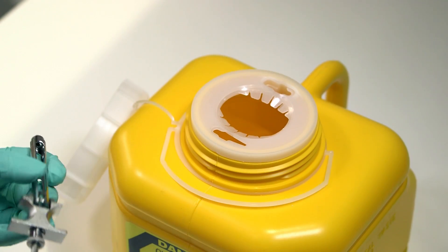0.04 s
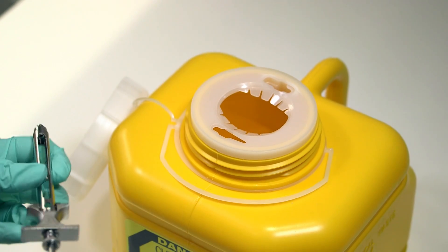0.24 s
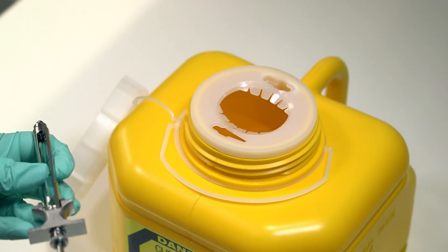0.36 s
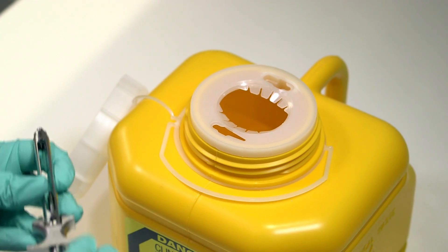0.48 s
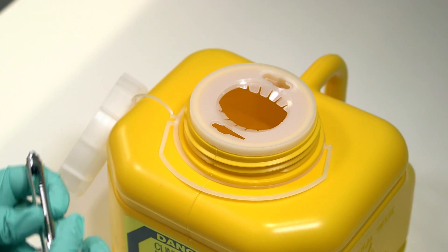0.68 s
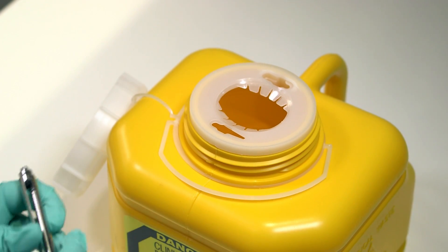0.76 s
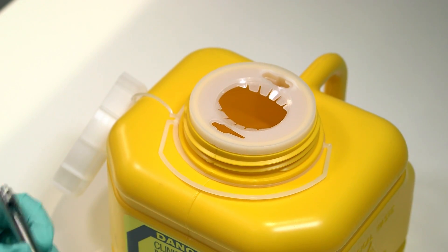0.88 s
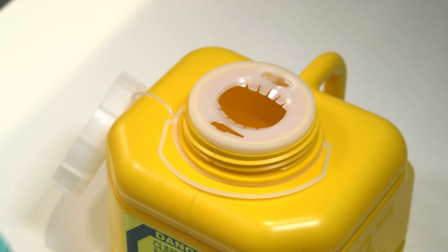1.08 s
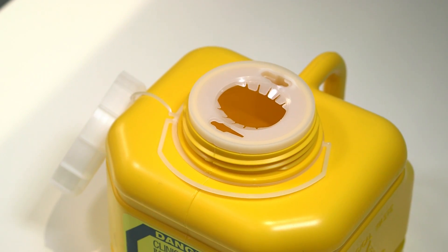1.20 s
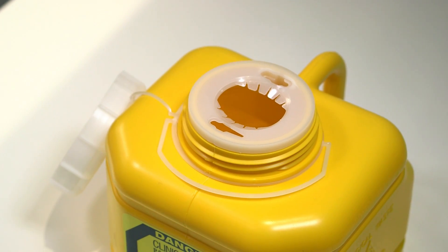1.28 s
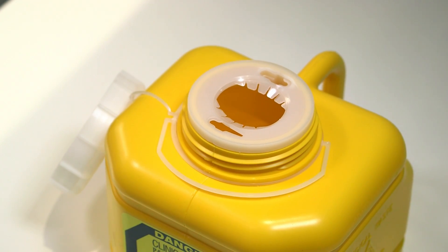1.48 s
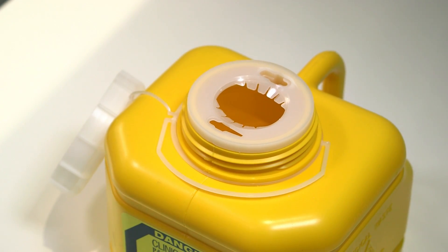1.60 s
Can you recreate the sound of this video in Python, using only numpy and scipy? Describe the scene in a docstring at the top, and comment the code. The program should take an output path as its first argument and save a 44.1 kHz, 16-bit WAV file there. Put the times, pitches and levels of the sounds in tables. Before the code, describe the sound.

A steel syringe is handled close up in a small, fairly dry room. Plastic shuffles softly with dull knocks from 0 s, peaking in hard hollow knocks near 0.35 s. From 0.5 s steel slides and rasps; sharp clicks land near 0.68 and 0.84 s, then bright clinks on glass around 1.0 to 1.2 s, with low thumps. Glove rustle and faint rumble fade by 1.6 s.

```python
"""A small room: a steel dental syringe is handled close by, beside a hollow plastic container.
First the plastic is shuffled and knocked; then steel parts slide, catch and clink on the glass cartridge.
Steel is noise chatter and slips through resonators, free rings and gliding rasps; plastic is struck modes,
wall noise and cracks. Jolts add low thumps. Rustle and rumble lie beneath, and the sound dies away
as the hands withdraw."""
import sys
import numpy as np
from scipy import signal
from scipy.fft import rfft, irfft
from scipy.io import wavfile
from scipy.ndimage import map_coordinates

SR = 44100
rng = np.random.default_rng(int(sys.argv[2]) if len(sys.argv) > 2 else 0)


def bounce(signal):
    """Save signal as a 16-bit WAV file at the path given by the first command-line argument."""
    frames = np.transpose(np.atleast_2d(signal))
    limited = np.clip(frames, -1, 1)
    pcm = np.round(limited * 32767).astype(np.int16)
    wavfile.write(sys.argv[1], SR, pcm)


N = 72765
TIME_S = np.arange(N) / SR


def from_db(db):
    """Decibels to amplitude gain."""
    return 10 ** (np.asarray(db) / 20)


def rms_one(x):
    """Scale to unit rms."""
    return x / np.sqrt(np.mean(x ** 2) + 1e-20)


def level(curve):
    """Gain over time from (time_s, level_db) points."""
    return from_db(np.interp(TIME_S, *np.transpose(curve)))


def filtered(x, cutoff_hz, kind, order=2):
    """Butterworth filter."""
    sos = signal.butter(order, min(cutoff_hz, SR / 2 - 100), kind, fs=SR, output="sos")
    return signal.sosfilt(sos, x + 1e-18)


def noise(colour):
    """Unit-rms noise shaped by (freq_hz, density_db) points, interpolated over log frequency."""
    freq_hz, density_db = np.transpose(colour)
    bins_hz = np.fft.rfftfreq(N, 1 / SR)
    gain = from_db(np.interp(np.log(bins_hz + 1), np.log(freq_hz), density_db))
    return rms_one(irfft(rfft(rng.standard_normal(N)) * gain, N))


def wander(cutoff_hz):
    """Low-passed random drift of unit rms, clipped at two."""
    drift = rms_one(filtered(rng.standard_normal(N), cutoff_hz, "low"))
    return np.clip(drift, -2, 2)


def dying(start_s, t60_s):
    """Envelope that jumps to one and decays exponentially, 60 dB per t60."""
    age_s = np.maximum(TIME_S - start_s, 0)
    return (TIME_S >= start_s) * np.exp(-np.log(1000) * age_s / t60_s)


def ring(start_s, pitch_hz, t60_s):
    """One struck mode: a decaying sine."""
    return dying(start_s, t60_s) * np.sin(2 * np.pi * pitch_hz * (TIME_S - start_s))


# Syringe resonances, damped by the fingers: pitch_hz, width_hz, level_db
SYRINGE_MODES = [(3485, 370, -2.5), (4240, 250, -9), (6724, 350, -0.5), (9040, 500, -17.5),
                 (10350, 480, -11.5), (11410, 230, 4), (12080, 200, 8), (12860, 370, 4.5), (14000, 480, -2)]
LOWER_PART_HZ = 8000
CONTACT_DB = -13.5
GRIP_CHANGES_HZ = 22


def syringe_body(lower_force, upper_force, grip_db):
    """Contact forces drive damped resonators; the shifting grip varies each; some force is heard directly."""
    out = from_db(CONTACT_DB) * filtered(upper_force, 4300, "high")
    for pitch_hz, width_hz, level_db in SYRINGE_MODES:
        radius = np.exp(-np.pi * width_hz / SR)
        grip = wander(GRIP_CHANGES_HZ)
        force = lower_force if pitch_hz < LOWER_PART_HZ else upper_force
        force = force * from_db(level_db + grip_db * grip)
        poles = [1, -2 * radius * np.cos(2 * np.pi * pitch_hz / SR), radius * radius]
        out += (1 - radius * radius) / 2 * signal.lfilter([1, 0, -1], poles, force + 1e-18)
    return out


# Steel catches on steel and glass: start_s, level_db, contact_s, lower_modes_db, ring_db
# (lower_modes_db and ring_db relative to level_db)
CATCHES = [(0.224, -39.5, 0.0025, 17.5, -23.5), (0.5536, -27, 0.0071, -28.5, -10),
           (0.605, -29.5, 0.0045, -10, -24.5), (0.6637, -33.5, 0.0057, -1, -38),
           (0.673, -23.5, 0.0031, 4, -33.5), (0.6814, -13.5, 0.0015, -4, -29),
           (0.6847, -18, 0.0026, -2, -31), (0.727, -30.5, 0.0053, -0.5, -26),
           (0.7357, -30, 0.0077, -10.5, -25), (0.778, -26.5, 0.0066, -12, -23),
           (0.787, -39.5, 0.0013, 14.5, -20.5), (0.8384, -15.5, 0.0014, 8, -15),
           (0.8408, -9.5, 0.0014, -15, -18), (0.961, -33, 0.0014, 13, -19), (0.972, -19, 0.0043, 0, -13.5),
           (0.998, -20.5, 0.0054, -12, -40), (1.0596, -27, 0.0017, -18, -19.5),
           (1.064, -15, 0.0025, -13, -4), (1.0669, -27, 0.00084, -25, 1), (1.1156, -26, 0.004, 1.5, -6),
           (1.121, -25.5, 0.0055, -5, -8), (1.145, -28, 0.0032, 3.5, -11), (1.2253, -26, 0.0027, 1.5, -9),
           (1.4156, -40, 0.0033, 0.5, -2.5)]
# Free ring of the barrel: pitch_hz, level_db, t60_s
BARREL_MODES = [(4250, -31.5, 0.36), (6580, -14, 0.12), (9240, -20, 0.12), (9715, -9.5, 0.07),
                (11340, -24.5, .15), (12310, -5.5, .11), (13000, -14.5, 0.14), (15160, -14, .11)]
# Light taps on the glass cartridge and small parts: start_s, pitch_hz, level_db, t60_s
TAPS = [(0.2269, 9100, -34, 0.013), (0.9998, 9140, -24, 0.068), (1.059, 14600, -19.5, 0.03),
        (1.0698, 12500, -9.5, 0.022), (1.1175, 14000, -22.5, 0.035), (1.118, 3420, -35.5, 0.046),
        (1.415, 6650, -41, 0.038), (1.418, 4230, -54, 0.053), (1.512, 4240, -59.5, 0.063)]
CATCH_BODY_DB = 2


def clinks():
    """Each catch is brief random-sign chatter into the body plus a free barrel ring; taps are single modes."""
    lower_force, upper_force, rings = np.zeros((3, N))
    for start_s, level_db, contact_s, lower_modes_db, ring_db in CATCHES:
        contact = (TIME_S >= start_s) * np.exp(-((TIME_S - start_s) / contact_s) ** 2)
        chatter = from_db(level_db) * rng.choice([-1, 1], N) * contact
        lower_force += from_db(lower_modes_db) * chatter
        upper_force += chatter
        for pitch_hz, mode_db, t60_s in BARREL_MODES:
            part_db = lower_modes_db * (pitch_hz < LOWER_PART_HZ)
            rings += from_db(level_db + ring_db + mode_db + part_db) * ring(start_s, pitch_hz, t60_s)
    taps = sum(from_db(level_db) * ring(start_s, pitch_hz, t60_s)
               for start_s, pitch_hz, level_db, t60_s in TAPS)
    return from_db(CATCH_BODY_DB) * syringe_body(lower_force, upper_force, grip_db=0.0) + rings + taps


# Plunger slide level: time_s, level_db
SLIDE_LEVEL = [(0.0, -61), (0.44, -78), (0.49, -45.5), (0.545, -46), (0.64, -47), (0.71, -44),
               (0.755, -52.5), (0.78, -37.5), (0.80, -44), (0.87, -40.5), (0.935, -56.5), (1.65, -75)]
SLIPS_PER_S, SLIP_SPREAD_DB, SLIDE_LOWER_DB, GRIP_DB = 880, 3, -1.5, 4.5
PITCH_DRIFT_SHARE, PITCH_DRIFT_HZ = 0.029, 10


def plunger():
    """Sliding steel: dense uneven slips drive the body; varying playback speed drifts its resonances."""
    excess = np.minimum(rng.exponential(1, N), 4)
    sizes = from_db(SLIP_SPREAD_DB * excess) * rng.choice([-1, 1], N)
    slips = sizes * (rng.random(N) < SLIPS_PER_S / SR)
    scrape = syringe_body(from_db(SLIDE_LOWER_DB) * slips, slips, grip_db=GRIP_DB)
    position = np.cumsum(1 + PITCH_DRIFT_SHARE * wander(PITCH_DRIFT_HZ))
    drifting = map_coordinates(scrape, [position], order=5, mode="mirror")
    return level(SLIDE_LEVEL) * rms_one(drifting)


# Rod strokes: middle_s, length_s, pitch_hz, glide_oct_per_s, level_db, overtone_ratio, overtone_db
# (overtone_db relative to level_db)
ROD_STROKES = [(0.518, .05, 3143, -2.5, -46.5, 3.3, 2), (0.646, 0.045, 4200, -7, -58, 2.36, 7),
               (0.774, 0.14, 3360, -0.7, -49.5, 1.78, -0.5), (0.778, 0.045, 8560, -0.5, -45, 1.48, 6)]
RASP_CUTOFF_HZ = 170  # scaled by the mode ratio
BURST_DB, BURST_CUTOFF_HZ = 4, 60  # the rod sticks and frees itself in short bursts


def rod():
    """The rubbed rod rasps in two bending modes that glide as its free length changes."""
    out = np.zeros(N)
    for middle_s, length_s, pitch_hz, glide_oct_per_s, level_db, overtone_ratio, overtone_db in ROD_STROKES:
        age_s = np.clip(TIME_S - middle_s, -length_s / 2, length_s / 2)
        stroke = np.cos(np.pi * age_s / length_s)
        phase = 2 * np.pi * np.cumsum(pitch_hz * 2 ** (glide_oct_per_s * age_s)) / SR
        bursts_db = BURST_DB * wander(BURST_CUTOFF_HZ)
        for ratio, mode_db in ((1, level_db), (overtone_ratio, level_db + overtone_db)):
            rasp = rms_one(filtered(rng.standard_normal(N), RASP_CUTOFF_HZ * ratio, "low"))
            out += from_db(mode_db + bursts_db) * stroke * rasp * np.sin(ratio * phase)
    return out


# Jolts through the hand, before the high-pass: start_s, push_db
HAND_JOLTS = [(0.343, -25), (0.372, -25), (0.555, -26.5), (0.681, -18.5), (0.779, -26), (0.838, -13),
              (0.9749, -19), (1.0007, -23), (1.0628, -15), (1.12, -20.5), (1.144, -28), (1.225, -23.5)]
# Snaps of the hardest catches, before the high-pass: start_s, level_db, corner_hz
CATCH_SNAPS = [(0.682, -23.5, 450), (0.839, -18, 647), (0.9995, -24.5, 2500), (1.0641, -9.5, 1850)]
PUSH_RISE_S, THUMP_HIGHPASS_HZ = 0.0069, 27


def thumps():
    """Each jolt is a short push, high-passed so it swings back; sharp decaying steps add the snaps."""
    pushes = np.zeros(N)
    for start_s, push_db in HAND_JOLTS:
        age = np.maximum(TIME_S - start_s, 0) / PUSH_RISE_S
        pushes += from_db(push_db) * age * np.exp(1 - age)
    snaps = sum(from_db(level_db) * dying(start_s, np.log(1000) / (2 * np.pi * corner_hz))
                for start_s, level_db, corner_hz in CATCH_SNAPS)
    return filtered(pushes + snaps, THUMP_HIGHPASS_HZ, "high", order=3)


# Knocks on the plastic: start_s, level_db, lowpass_hz, crack_db (relative to level_db), flex_hz
PLASTIC_KNOCKS = [(0.022, -20, 1500, -21.5, 796), (0.155, -13, 1900, -13.5, 452),
                  (0.2835, -16.5, 1800, -25.5, 910), (0.311, -23.5, 1400, -23, 805),
                  (0.3416, -4.5, 1150, -1, 448), (0.3707, -1, 4830, -8, 867),
                  (0.3933, -10, 2300, -13, 1580)]
# Container modes: pitch_hz, level_db
CONTAINER_MODES = [(350, -25), (421, -22.5), (486, -18), (630, -27), (778, -21), (866, -29.5), (903, -18),
                   (1140, -27.5), (1415, -19.5), (1645, -20), (1732, -21.5), (1940, -24)]
# Dense, quickly damped wall modes: freq_hz, density_db (per Hz)
WALL_COLOUR = [(150, -19.5), (280, -11.5), (450, 5), (620, -9), (900, -5), (1900, -2), (2400, -11.5),
               (5000, -7.5), (8000, -13.5), (16000, -30)]
# Bright crack: freq_hz, density_db (per Hz)
CRACK_COLOUR = [(500, -19.5), (2500, 0.5), (6500, -1), (8500, 3.5), (10000, -1.5), (15000, -7)]
MODES_T60_S, WALL_T60_S, CRACK_T60_S = 0.072, 0.057, 0.11
WALL_DB, CRACK_DB, FLEX_DB = -13.5, -24, -11.5
FLEX_CYCLES = 12  # cycles to fall 60 dB


def container():
    """Hollow knocks: wall flex, modes and dense wall noise, low-passed per knock, plus a bright crack."""
    out = np.zeros(N)
    for start_s, level_db, lowpass_hz, crack_db, flex_hz in PLASTIC_KNOCKS:
        modes = sum(rng.choice([-1, 1]) * from_db(mode_db) * ring(start_s, pitch_hz, MODES_T60_S)
                    for pitch_hz, mode_db in CONTAINER_MODES)
        walls = from_db(WALL_DB) * noise(WALL_COLOUR) * dying(start_s, WALL_T60_S)
        crack = from_db(CRACK_DB + crack_db) * noise(CRACK_COLOUR) * dying(start_s, CRACK_T60_S)
        flex = from_db(FLEX_DB) * ring(start_s, flex_hz, FLEX_CYCLES / flex_hz)
        out += from_db(level_db) * (filtered(flex + modes + walls, lowpass_hz, "low") + crack)
    return out


# Shuffle level: time_s, level_db
SHUFFLE_LEVEL = [(0, -41), (0.07, -38), (0.13, -49), (0.25, -45), (0.33, -40.5), (0.46, -40.5), (0.54, -60),
                 (0.7, -77)]
# Shuffle spectrum: freq_hz, density_db (per Hz)
SHUFFLE_SPECTRUM = [(200, -10), (330, -3.5), (450, 6), (620, -6), (770, -1.5), (1100, -13), (1420, -7),
                    (1800, -24), (2300, -24.5), (6000, -42.5)]


def shuffle():
    """Plastic shuffling: coloured noise under a level curve."""
    return level(SHUFFLE_LEVEL) * noise(SHUFFLE_SPECTRUM)


ROOM_T60_S, ROOM_TREBLE_T60_S, ROOM_SPLIT_HZ, ROOM_DELAY_S = 0.34, 0.36, 12000, 0.0048


def room(x):
    """Diffuse tail of a small room: decaying noise in two bands, slightly longer in the treble."""
    white = rng.standard_normal(N)
    tail = filtered(white, ROOM_SPLIT_HZ, "low", order=1) * dying(ROOM_DELAY_S, ROOM_T60_S)
    tail += filtered(white, ROOM_SPLIT_HZ, "high", order=1) * dying(ROOM_DELAY_S, ROOM_TREBLE_T60_S)
    return signal.fftconvolve(x, tail / np.sqrt(np.sum(tail ** 2)))[:N]


# Rustle level: time_s, level_db
RUSTLE_LEVEL = [(0, -56.5), (0.9, -53.5), (0.98, -46), (1.2, -47.5), (1.36, -58), (1.5, -63), (1.57, -71.5),
                (1.65, -82.5)]
# Rustle spectrum: freq_hz, density_db (per Hz)
RUSTLE_SPECTRUM = [(150, -3), (400, -1.5), (800, -6), (4000, -11.5), (15000, -15)]


def rustle():
    """Soft gloves and air: coloured noise under a level curve."""
    return level(RUSTLE_LEVEL) * noise(RUSTLE_SPECTRUM)


# Rumble level: time_s, level_db
RUMBLE_LEVEL = [(0, -43.5), (1.36, -46.5), (1.45, -51), (1.65, -66.5)]
# Rumble spectrum: freq_hz, density_db (per Hz)
RUMBLE_SPECTRUM = [(20, 1.5), (100, -1.5), (160, -5.5), (250, -13.5), (500, -28), (1500, -51.5)]


def rumble():
    """Low room rumble: bass-heavy noise under a level curve."""
    return level(RUMBLE_LEVEL) * noise(RUMBLE_SPECTRUM)


STEEL_ROOM_DB, PLASTIC_ROOM_DB = -17, -7


def scene():
    """Plastic and steel in the room, with thumps, over shuffle, rustle and rumble."""
    plastic = container()
    steel = clinks() + plunger() + rod()
    reverb = room(from_db(PLASTIC_ROOM_DB) * plastic + from_db(STEEL_ROOM_DB) * steel)
    bed = shuffle() + rustle() + rumble()
    return (plastic + steel + thumps() + reverb + bed)[None]


CUTOFF_HZ = 16000


def record(dry):
    """Steep elliptic low-pass cuts the top."""
    return signal.sosfilt(signal.ellip(10, .2, 80, CUTOFF_HZ, fs=SR, output="sos"), dry)


dry = scene()
out = record(dry)
bounce(out)
```